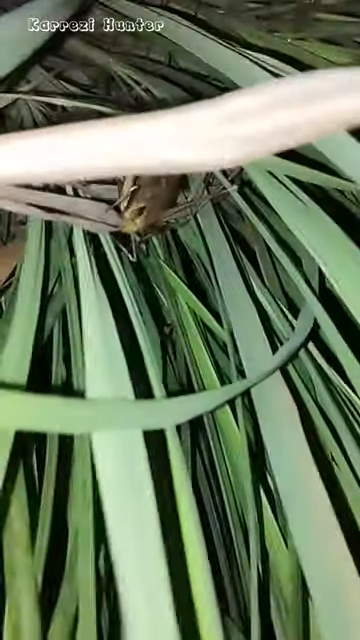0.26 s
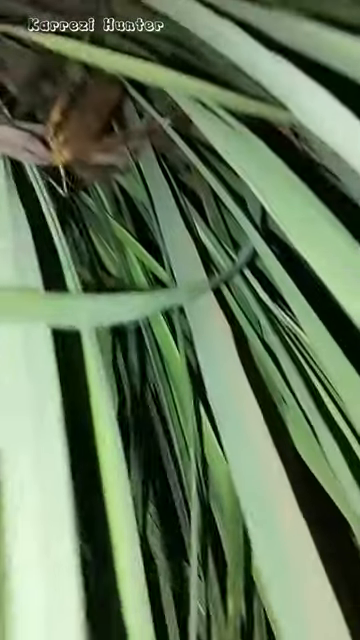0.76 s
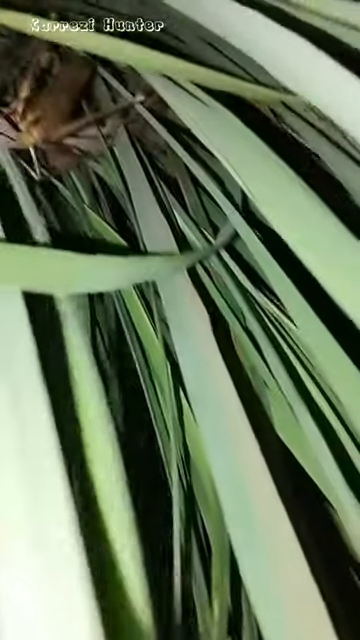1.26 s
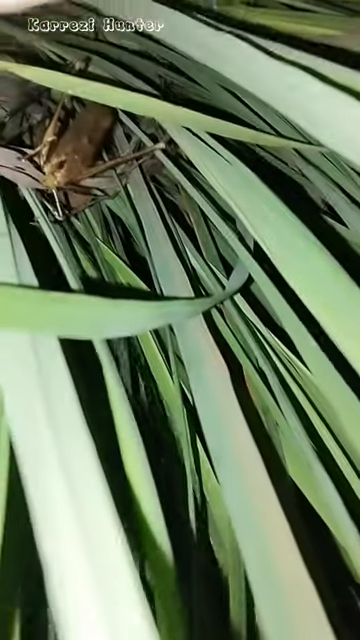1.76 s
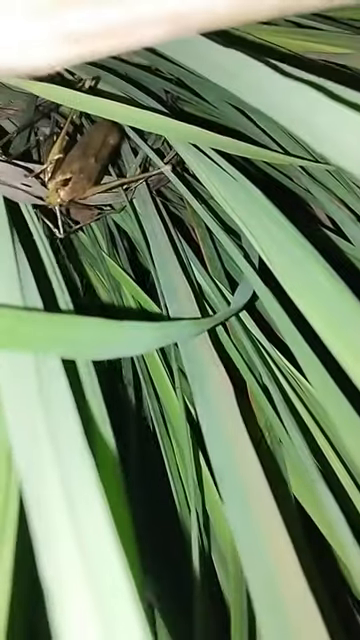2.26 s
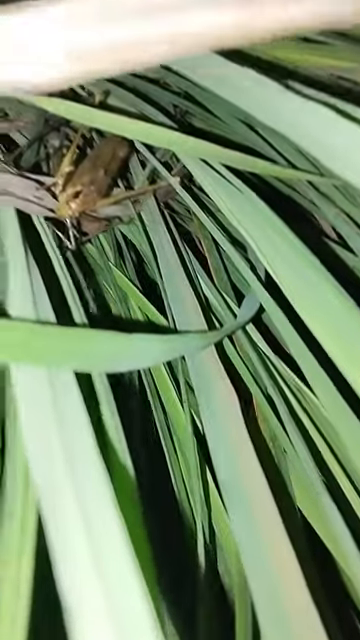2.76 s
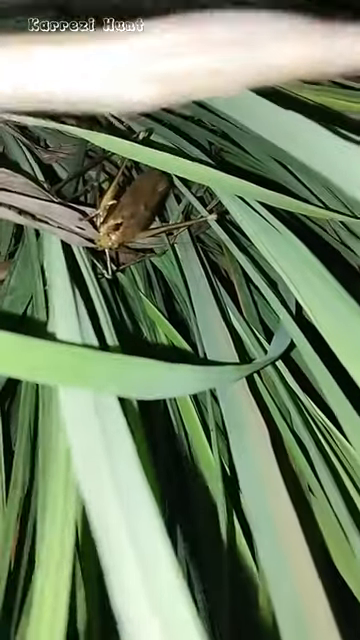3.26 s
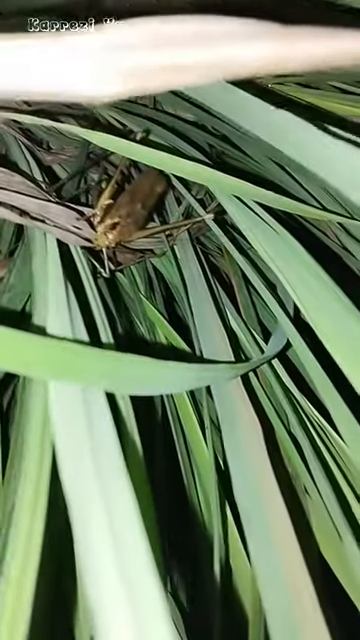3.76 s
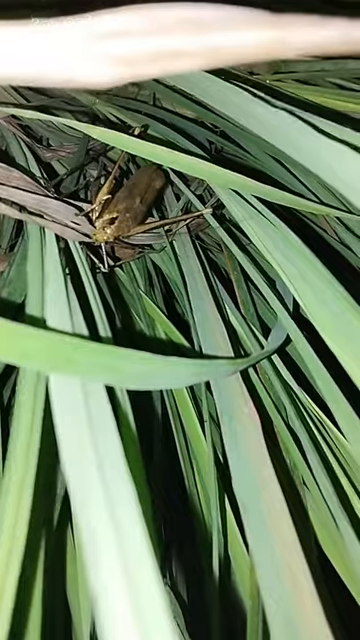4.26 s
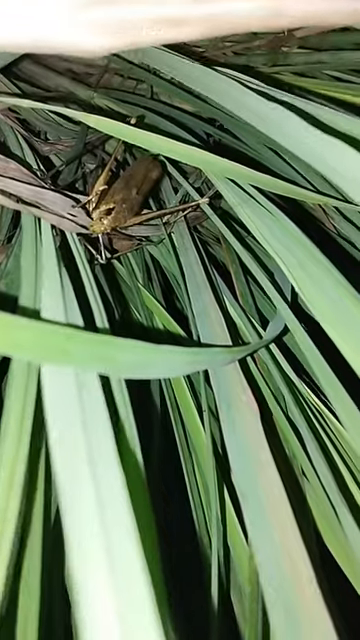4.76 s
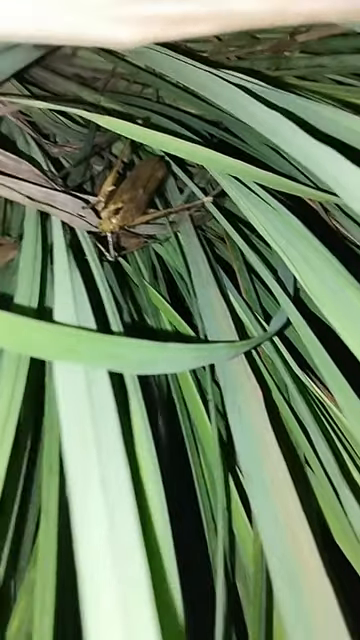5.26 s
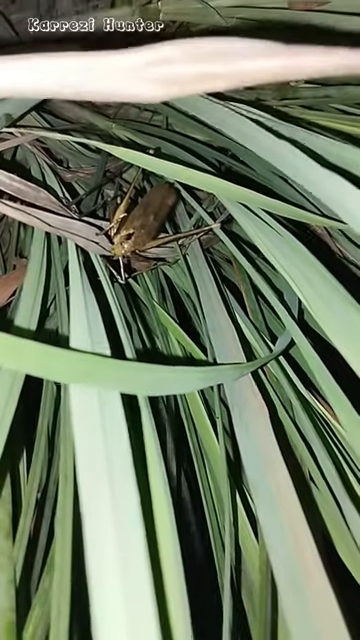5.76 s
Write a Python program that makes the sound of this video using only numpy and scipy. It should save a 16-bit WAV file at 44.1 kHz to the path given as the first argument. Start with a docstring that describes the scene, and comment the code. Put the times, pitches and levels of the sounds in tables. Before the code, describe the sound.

Night in long grass, a phone held very close to a katydid. From 0 s it rasps in a fast, even stutter of two- or three-stroke bursts: gritty lower scrapes around 2-3 kHz, then sharp flicks ringing near 7 kHz with a scratchy top. A phrase ends about 0.4 s, another runs 0.5-1.2 s, both rough with dull overload crackle. The longest pause follows, 1.2-1.4 s, where faint far insects swell and a soft handling bump is heard. Brief isolated bursts at 1.4-1.6 s lead into louder, cleaner, piercing buzzing from 1.65 s, now leaning right. Phrases continue with short gaps near 2.2, 2.35, 3.0, 3.55, 4.15, 4.45 and 4.9 s, a tiny bump in the last. The final phrase, 5.2-6 s, is slightly softer and runs to the end. Tight grass echoes, little tail, low quiet rumble.

```python
"""A tuft of long grass at night: a katydid rasps close to a phone that hears through a left and a right port.
Its wings beat in even phrases, in bursts of two or three strokes. Each stroke drags the scraper slowly
over a toothed file, then flicks back fast. Trains of clicks stand for the teeth; a filter rings the wing.
Grass adds quick echoes, the overloaded microphone crackles dully, and handling the phone makes soft bumps.
Filtered noise makes the low rumble and the far insects in the pauses."""
import sys
import numpy as np
from scipy import signal
from scipy.fft import rfft, irfft
from scipy.io import wavfile
from scipy.ndimage import uniform_filter1d, map_coordinates

SR = 44100
rng = np.random.default_rng(int(sys.argv[2]) if len(sys.argv) > 2 else 0)


def digitize_waveform(pressure):
    """Quantize a signal to 16-bit integers and store it at the path in sys.argv[1].

    Rows of a 2-D input are taken as channels; values are limited to [-1, 1].
    """
    field = np.atleast_2d(pressure).T
    bounded = np.clip(field, -1, 1)
    quanta = np.round(bounded * 32767).astype(np.int16)
    wavfile.write(sys.argv[1], SR, quanta)


N = 265041
TIME = np.arange(N) / SR  # seconds

# how hard the insect plays: (time [s], relative level [dB], extra press around a burst's last drag [dB])
EFFORT = [(0, -19.5, 11.5), (.42, -20, 13), (.6, -17, 6.5), (1.2, -20.5, 10.5), (1.42, -20.5, 1),
          (1.72, -14.5, -1), (2.12, -15.5, 0), (2.3, -16.5, -0.5), (2.85, -15.5, 0.5), (3.15, -16.5, 1),
          (3.9, -18, 3), (4.35, -16.5, 1.5), (4.7, -18, 3.5), (5.4, -20, 2.5), (6.01, -19.5, 2.5)]


def undb(db):
    """Turn decibels into a gain."""
    return 10 ** (np.asarray(db) / 20)


def unit(x):
    """Scale a sound to an rms of 1."""
    return x / np.sqrt(np.mean(x ** 2))


def read(table, at):
    """Look up every column of a table, its points joined by straight lines."""
    key, *columns = np.transpose(table)
    return [np.interp(at, key, column) for column in columns]


def band(x, lo_hz, hi_hz, order=2):
    """Keep one band of pitches, filtering forwards and backwards so that nothing is delayed."""
    edges = [lo_hz, min(hi_hz, .49 * SR)]
    return signal.sosfiltfilt(signal.butter(order, edges, "band", fs=SR, output="sos"), x)


def colour(x, points, size=4096):
    """Filter with the given (pitch [Hz], level [dB]) outline, with no sound ahead of its cause."""
    hz, db = np.transpose(points)
    grid = np.maximum(np.fft.rfftfreq(size, 1 / SR), 1)
    outline_db = np.interp(np.log(grid), np.log(hz), db)
    # folding the cepstrum gives the minimum-phase filter
    cepstrum = irfft(np.log(undb(outline_db)))
    cepstrum[1:size // 2] *= 2
    cepstrum[size // 2 + 1:] = 0
    response = irfft(np.exp(rfft(cepstrum)))
    return signal.fftconvolve(x, response)[:N]


def wander(rate):
    """Drift by chance with rms 1: random points, rate of them a second, joined by straight lines."""
    steps = rng.standard_normal(N)
    return unit(np.interp(TIME * rate, np.arange(N), steps))


def delayed(x, samples):
    """Read a sound a moving number of samples late."""
    return map_coordinates(x, [np.arange(N) - samples], order=3)


def bursts():
    """Beat the wings evenly through each phrase; one row per burst, columns as listed at the end."""
    # phrases of bursts: (end of first burst [s], end of last burst [s], strokes in each burst [count],
    #                     stroke period [s], lag in mid-phrase [s])
    phrases = [(.039, .417, [3] * 7, .0205, 0), (.514, 1.201, [3] * 12, .0205, -.0066), (1.425, 1.425, [3],
               .025, 0), (1.539, 1.586, [2, 2], .025, 0), (1.652, 2.163, [3, 2, 3, 3, 3, 3, 3, 2, 3, 2],
               .021, .001), (2.269, 2.334, [2, 3], .0205, 0), (2.454, 2.956, [3] * 9, .0205, .002),
               (3.065, 3.503, [3] * 8, .0205, .001), (3.636, 3.682, [3, 2], .0205, 0),
               (3.750, 4.126, [3] * 7, .0205, -.001), (4.194, 4.452, [3] * 5, .0205, 0),
               (4.522, 4.841, [3] * 6, .021, -.001), (4.961, 5.157, [3] * 4, .021, 0),
               (5.240, 6.027, [3] * 13, .021, -.001)]
    warm_up_db, warm_up_s = -1.5, .15  # a phrase starts a little soft and swells
    rows = []
    for first, last, groups, period, lag in phrases:
        beats = np.cumsum(groups) - groups[0]
        along = beats / max(beats[-1], 1)  # 0 to 1 through the phrase
        ends = first + (last - first) * along + lag * np.sin(np.pi * along)
        for end, strokes in zip(ends, groups):
            db, press_db = read(EFFORT, end)
            level_db = db + warm_up_db * np.exp(-(end - first) / warm_up_s)
            rows.append((end, strokes, period, level_db, press_db))
    # (end [s], strokes [count], stroke period [s], relative level [dB], press [dB])
    return np.array(rows)


def wing_motion():
    """Find the tooth rate and force of every drag and flick, and how firmly the scraper grips."""
    # one drag: (time from its flick [s], typical teeth per second [Hz], relative force [dB])
    drag_shape = [(-.0155, 3300, -40), (-.0138, 3100, 2), (-.0122, 3000, -8), (-.009, 3000, -1),
                  (-.006, 2500, 1), (-.0045, 2200, 4), (-.003, 2100, -10), (-.002, 2000, -40)]
    # one flick: (time from its own mark [s], typical teeth per second [Hz], relative force [dB])
    flick_shape = [(-.003, 5500, -25), (-.0018, 5800, -2), (0, 6400, 0), (.001, 6750, -3), (.002, 6950, -6),
                   (.004, 6980, -10)]
    drag_db = -7  # a drag against its flick
    first_db, first_late_s = -4, .001  # a burst's opening stroke is weaker and later
    press_at_s, press_width_s = -.0097, .0044
    press_cost = .029  # dB lost by the last flick for each dB of press
    lock_db = 15  # press that would grip fully
    # differences by chance
    burst_spread_db, drag_spread_db, flick_spread_db = .5, -.35, -1.35
    drag_speed_spread, flick_speed_spread = .14, .03  # as parts of the tooth rate
    stroke_scatter_s = .0012  # strokes before the last come a little early or late

    rate, force, grip = np.full((2, N), 3000.), np.zeros((2, N)), np.zeros(N)
    played = bursts()
    chance = rng.standard_normal((len(played), 3, 4))
    played[:, 3] += burst_spread_db * rng.standard_normal(len(played))
    waits = np.diff(played[:, 0], prepend=0)
    for (end, strokes, period, db, press_db), wait, luck in zip(played, waits, chance):
        strokes = int(round(strokes))
        near = slice(max(0, int((end - .08) * SR)), int((end + .01) * SR))
        push = np.zeros_like(force[:, near])
        # the wing bears down in the middle of the last drag
        hard_db = press_db * np.exp(-((TIME[near] - end - press_at_s) / press_width_s) ** 2 / 2)
        grip[near] += hard_db / lock_db
        for k in range(strokes):  # counted back from the last stroke
            speed, drag_luck, flick_luck, time_luck = luck[k]
            first = k == strokes - 1
            span = .7 if first and wait > .08 else 1  # after a rest the opening stroke is short
            scatter_s = (k > 0) * stroke_scatter_s * time_luck
            flick_s = end - k * period + first * first_late_s + scatter_s
            age = (TIME[near] - flick_s) / span
            # a hard last drag leaves less swing for its flick
            drag_move_db = drag_db + hard_db + drag_spread_db * drag_luck
            flick_move_db = -press_cost * press_db * (k == 0) + flick_spread_db * flick_luck
            moves = [(drag_shape, drag_move_db, drag_speed_spread),
                     (flick_shape, flick_move_db, flick_speed_spread)]
            for m, (shape, move_db, spread) in enumerate(moves):
                hz, shape_db = read(shape, age)
                on = (age > shape[0][0]) & (age < shape[-1][0])
                rate[m, near][on] = hz[on] * (1 + spread * speed)
                push[m] += on * undb(shape_db + move_db + first * first_db)
        # level the whole burst, whatever its number of strokes
        strength = np.sqrt(np.sum(push ** 2) / (strokes * period * SR))
        force[:, near] += push * undb(db) / strength
    return rate, force, np.clip(grip, 0, .6)


def teeth(hz, jitter, grit, uneven_db, count=8):
    """Snap the scraper from tooth to tooth: a slightly uneven train of clicks with some noisy grit."""
    phase = 2 * np.pi * np.cumsum(hz * (1 + jitter * wander(1500))) / SR
    # harmonics in step add up to clicks
    clicks = sum(np.cos(k * phase) * (k * hz < SR / 2) for k in range(1, count + 1))
    gritty = unit(clicks) + grit * rng.standard_normal(N)
    return gritty * undb(uneven_db * np.tanh(wander(600)))


def katydid(rate, force, grip):
    """Ring one wing with drags and flicks; its side lobes come and go with the wing's pose."""
    # ring of the wing: (pitch [Hz], relative level [dB])
    wing = [(900, -31.5), (2400, -20.5), (3800, -15.5), (5100, -13), (5880, -2), (6190, -7), (6550, -0.5),
            (6950, 5), (7650, -6), (8300, -14), (9200, -21), (10100, -42.5), (11200, -22.5), (13500, -64),
            (15500, -15.5)]
    # pose of the wing: (time [s], gain of lower lobe [dB], gain of upper lobe [dB])
    lobes = [(0, 7, 3), (.5, -1.5, -4), (1.1, 2, 5.5), (1.65, 9.5, -3.5), (2.2, 5, -0.5), (3.5, 4.5, 2.5),
             (4.4, 1.5, 5.5), (5.1, 4, 8.5), (6.01, 1.5, 5.5)]
    grip_hz = 2097  # tooth rate towards which a hard drag is pulled by the wing's ring
    loose = 1 - grip  # a firm grip makes the rasp more even and tonal
    drag_hz = loose * rate[0] + grip * grip_hz
    drag_teeth = teeth(drag_hz, jitter=.11 * loose, grit=.7 * loose, uneven_db=3.2 * loose)
    flick_teeth = teeth(rate[1], jitter=.027, grit=.83, uneven_db=.5)
    drag = colour(force[0] * drag_teeth, wing)
    flick = colour(force[1] * flick_teeth, wing)
    song = unit(drag) * np.std(force[0]) + unit(flick) * np.std(force[1])
    lower, upper = undb(read(lobes, TIME))
    lower_change = (lower - 1) * band(song, 4900, 6200)
    upper_change = (upper - 1) * band(song, 7200, 9000)
    return song + lower_change + upper_change


def treble(song):
    """Pick out the scratchy top above the wing's ring."""
    return band(song, 7800, 20000, order=4)


def grass(song):
    """Add quick echoes from close blades, shifting as the phone moves, and the tuft's short faint tail."""
    count, near_db, near_s, sway_s = 4, -17, .004, .00006  # close echoes
    far_db, far_s, size = -17, .021, 8192  # tail: level, decay time and length in samples
    out = song
    for k in range(count):
        late_s = near_s * (k + 1 + rng.random()) / count + sway_s * wander(1.15)
        out = out + undb(near_db) * delayed(song, late_s * SR)
    tail = rng.standard_normal(size) * np.exp(-np.arange(size) / SR / far_s)
    lingering = band(song, 4000, 9000, order=1)
    return out + undb(far_db) * signal.fftconvolve(lingering, tail / np.linalg.norm(tail))[:N]


def crackle(song):
    """Crackle dully as the microphone overloads at the song's loudest, stronger where the press is higher."""
    per_s, spread_db = 1300, 3  # how many pops, and how unequal
    steepness, most = 1.056, 6  # growth with the song's power, and where it levels off
    no_press_db, db_per_press = -32, 1.19  # gain at no press; dB more for each dB of press
    power = np.abs(uniform_filter1d(unit(song) ** 2, int(.0043 * SR)))
    power = most * np.tanh(power / most)
    popping = rng.random(N) < per_s / SR
    pops = popping * rng.choice([-1, 1], N) * undb(spread_db * rng.standard_normal(N))
    # dull tone: (pitch [Hz], relative level [dB])
    dull = [(30, -8), (120, 5), (700, 3.5), (2000, 1), (4000, 1), (9000, -18.5)]
    pops = unit(colour(pops, dull))
    press_db = read(EFFORT, TIME)[1]
    return pops * np.std(song) * power ** steepness * undb(no_press_db + db_per_press * press_db)


def night():
    """Shape noise into a low rumble and a far chorus of insects, gently swaying together."""
    # outline of the night air before its two parts are levelled: (pitch [Hz], relative density [dB])
    night_air = [(22, -2), (55, -2), (85, -6), (130, -6), (220, -17), (500, -32), (1200, -43), (2500, -45),
                 (5200, -45), (5900, -28), (6700, -23), (7900, -44), (10000, -64), (16000, -66)]
    rumble_db, chorus_db = -55.5, -44.5  # gains of the parts below and above 400 Hz
    swell_at_s, swell_width_s, swell_peak_db = 1.33, .069, 9  # the far chorus rises briefly
    air = unit(colour(rng.standard_normal(N), night_air))
    chorus = band(air, 400, 20000)
    rumble = air - chorus
    swell_db = swell_peak_db * np.exp(-((TIME - swell_at_s) / swell_width_s) ** 2 / 2)
    both = rumble * undb(rumble_db) + chorus * undb(chorus_db + swell_db)
    return both * undb(2 * wander(5.4))


def handling_bumps():
    """Bump softly as the phone is handled: very short fading bursts of dull noise."""
    # (start [s], peak level [dB], upper edge of the bump's band [Hz])
    handling = [(1.251, -33.5, 3520), (1.447, -35, 695), (4.894, -42, 2000)]
    decay_s = .0008
    out = 0
    for start, db, hz in handling:
        age = np.maximum(TIME - start, 0)
        burst = rng.standard_normal(N) * (age > 0) * np.exp(-age / decay_s)
        bump = band(burst, 80, hz)
        out = out + undb(db) * bump / np.abs(bump).max()
    return out


def scene():
    """Bring the song to the left port first, mostly louder to the right; each has its own grass echoes."""
    # how the phone is held: (time [s], ring at right minus left [dB], lag of right port [samples])
    hold = [(0, -1, 11.87), (1.3, 3.5, 14.8), (1.65, 8.5, 10.6), (1.95, 13, 13.1), (2.4, 6, 8.05),
            (2.85, 11, 8.3), (4.1, 7.5, 8.13), (4.7, 5.5, 8.17), (6.01, 6.5, 7.85)]
    top_db = -2  # scratchy top at either port
    left_crackle_db, right_crackle_db = 0, -7
    crackle_turn = .67  # dB of crackle lost at left and gained at right for each dB of facing
    motion = wing_motion()
    # the ring is shared, but the scratchy top differs from port to port
    song, aside = (katydid(*motion) for _ in range(2))
    top = treble(song)
    facing_db, lag = read(hold, TIME)
    facing = undb(facing_db)
    ring = (song - top) * np.sqrt(2 / (1 + facing ** 2))  # keeps the two ports' total power even
    left = grass(ring + undb(top_db) * treble(aside))
    right = grass(facing * ring + undb(top_db) * top)
    left = left + undb(left_crackle_db - crackle_turn * facing_db) * crackle(song)
    right = right + undb(right_crackle_db + crackle_turn * facing_db) * crackle(song)
    shared = night() / 2  # part of the night air reaches both ports alike
    return np.array([port + shared + night() + handling_bumps() for port in (left, delayed(right, lag))])


def record(dry):
    """Hold down the loudest moments with a fast smooth limiter, then cut the top."""
    ceiling, top_hz = .8, 15900  # level the envelope approaches; highest pitch kept
    power = np.abs(uniform_filter1d(dry ** 2, int(.0005 * SR), axis=1))
    envelope = np.sqrt(2 * power)
    held = dry / (1 + (envelope / ceiling) ** 4) ** (1 / 4)
    return signal.sosfilt(signal.ellip(10, .2, 70, top_hz, fs=SR, output="sos"), held)


dry = scene()
out = record(dry)
digitize_waveform(out)
```